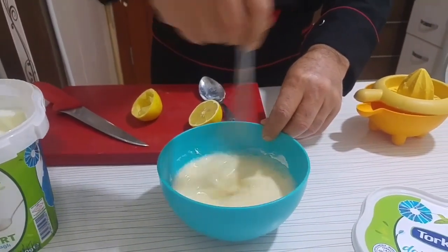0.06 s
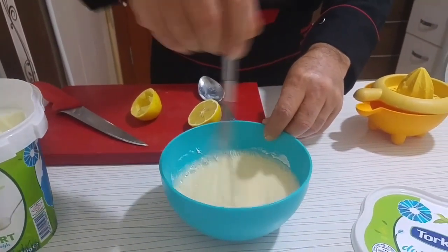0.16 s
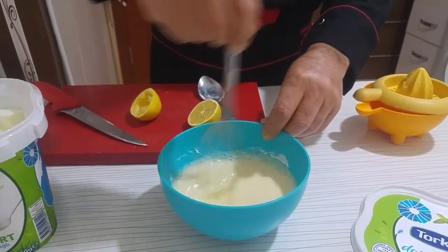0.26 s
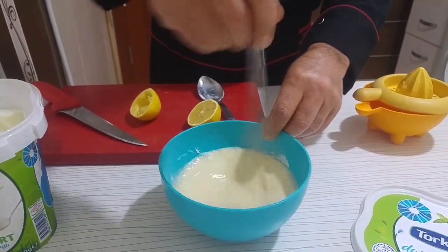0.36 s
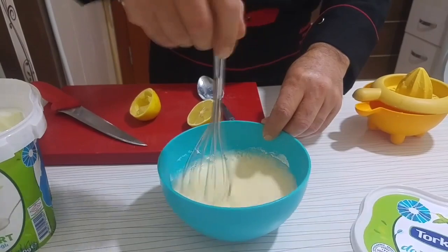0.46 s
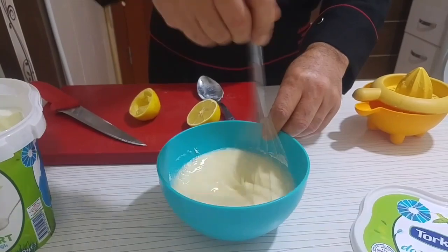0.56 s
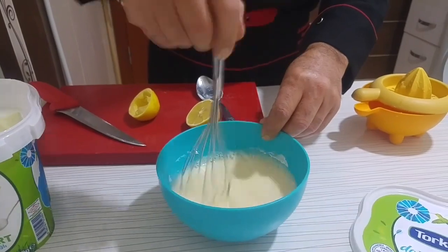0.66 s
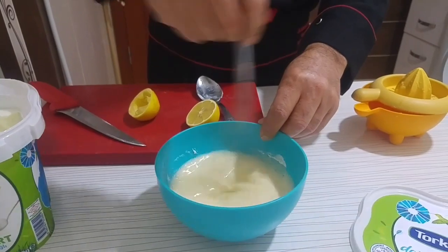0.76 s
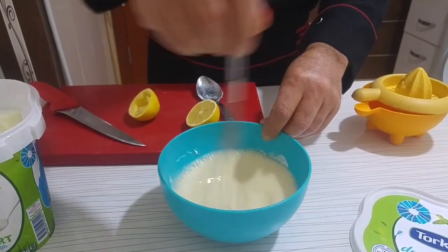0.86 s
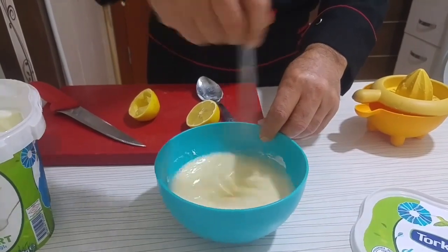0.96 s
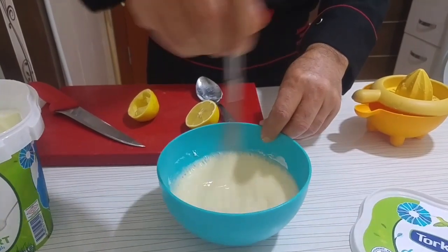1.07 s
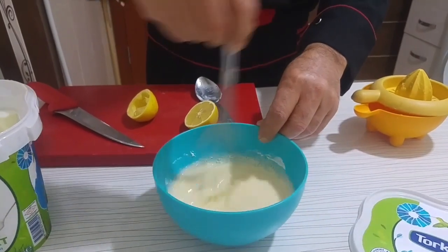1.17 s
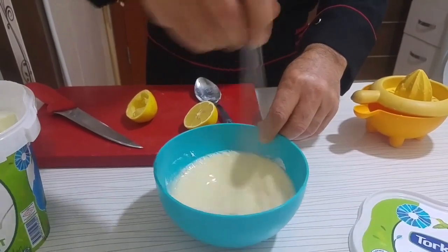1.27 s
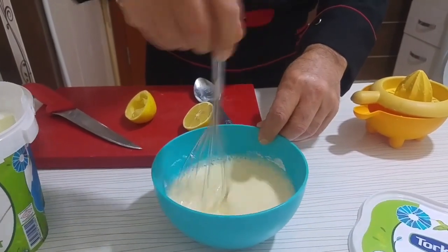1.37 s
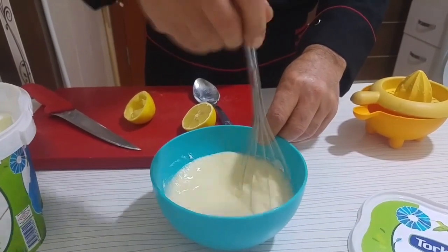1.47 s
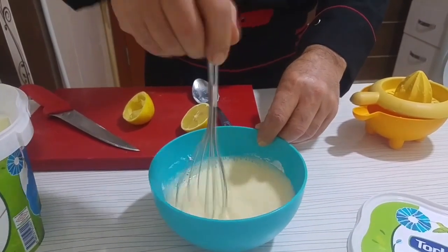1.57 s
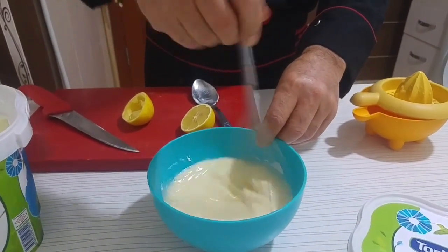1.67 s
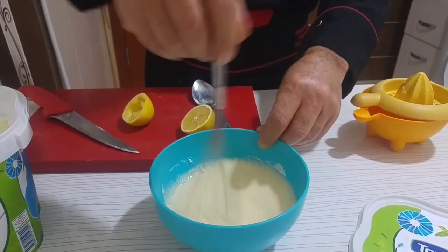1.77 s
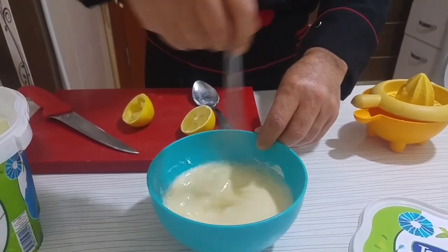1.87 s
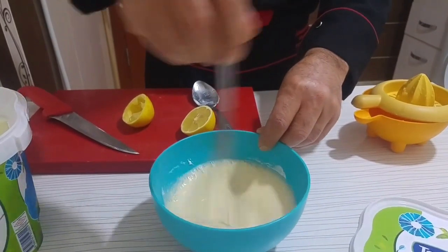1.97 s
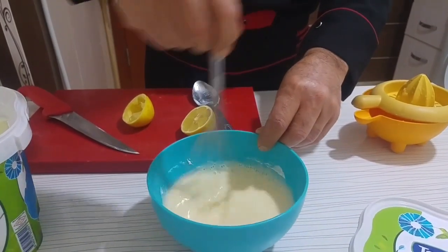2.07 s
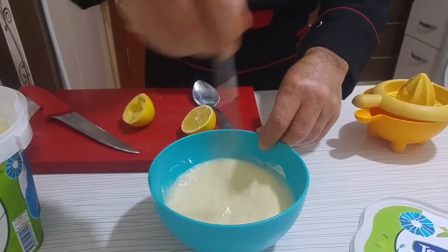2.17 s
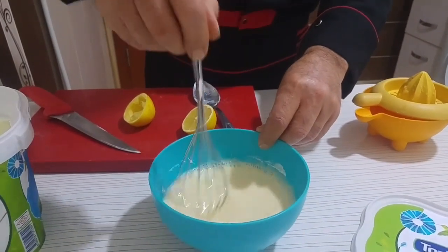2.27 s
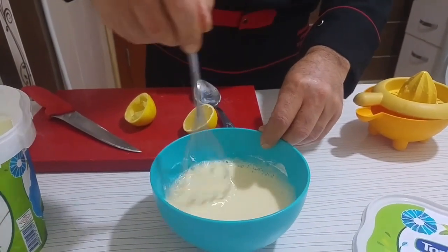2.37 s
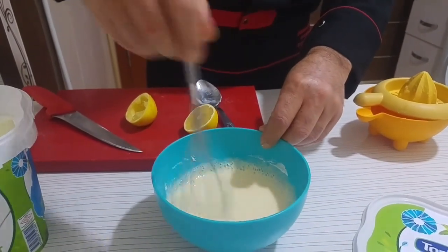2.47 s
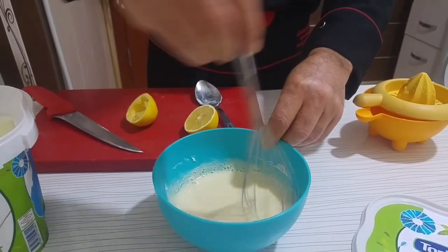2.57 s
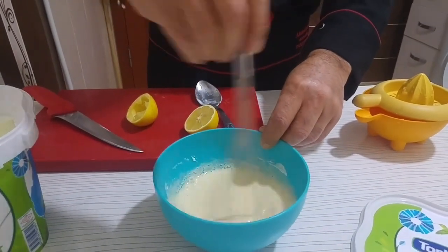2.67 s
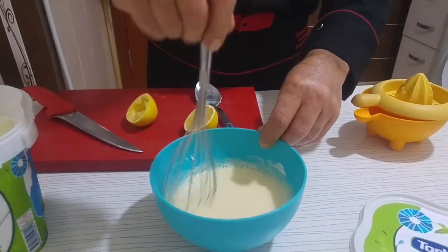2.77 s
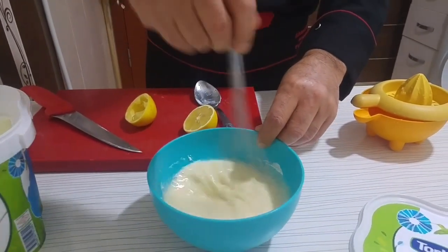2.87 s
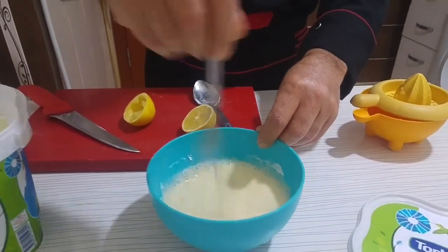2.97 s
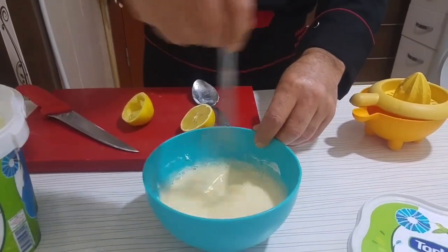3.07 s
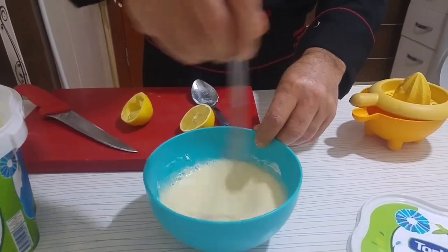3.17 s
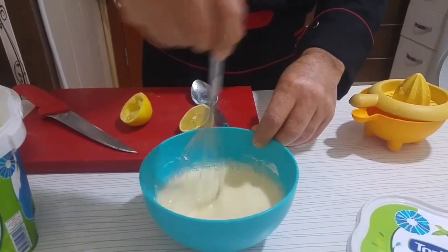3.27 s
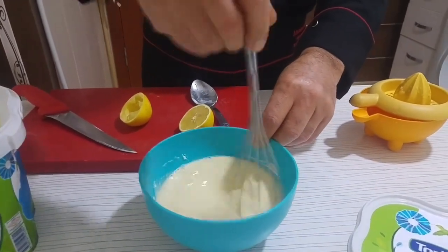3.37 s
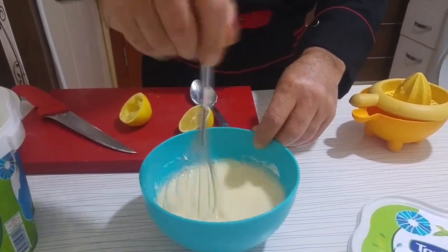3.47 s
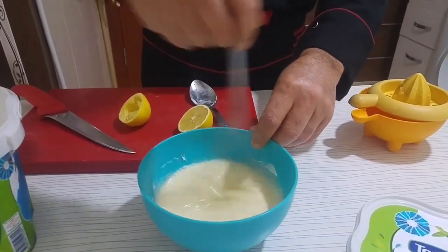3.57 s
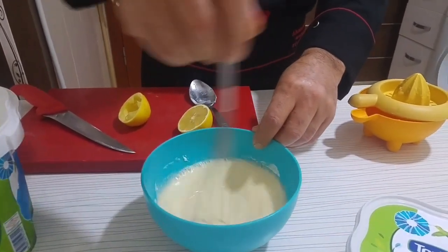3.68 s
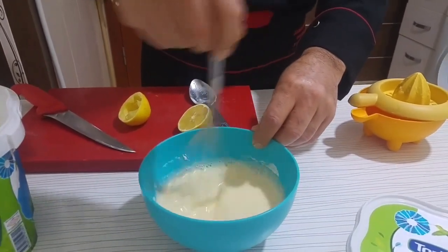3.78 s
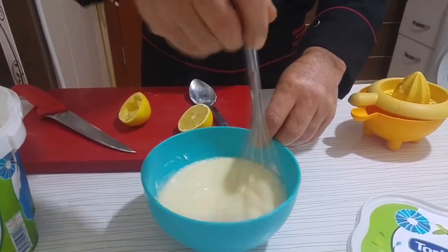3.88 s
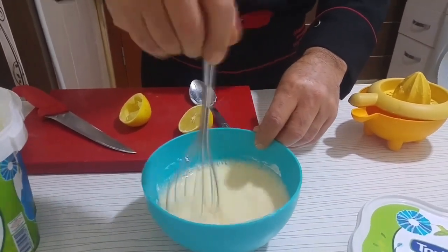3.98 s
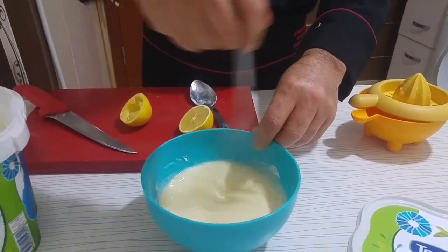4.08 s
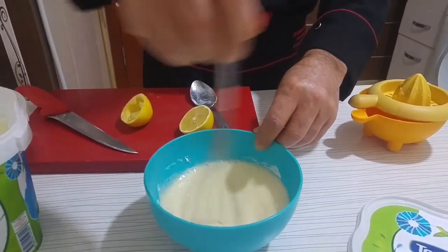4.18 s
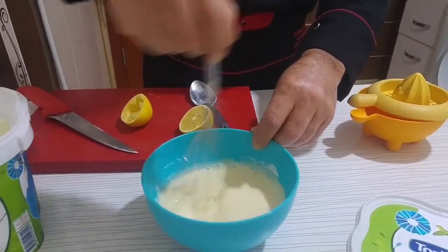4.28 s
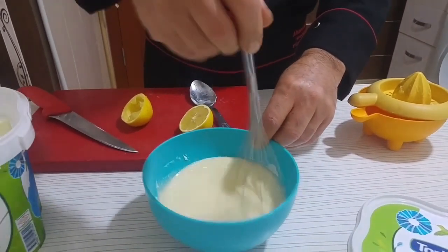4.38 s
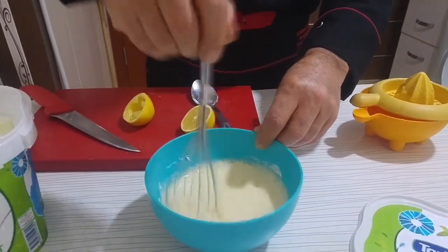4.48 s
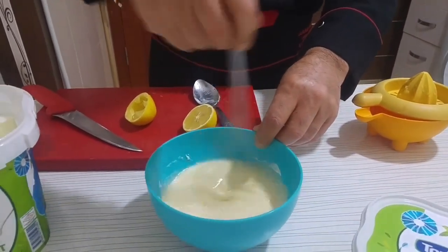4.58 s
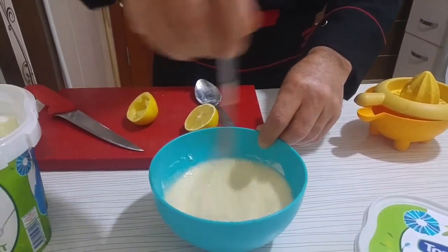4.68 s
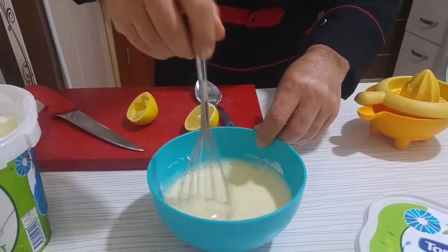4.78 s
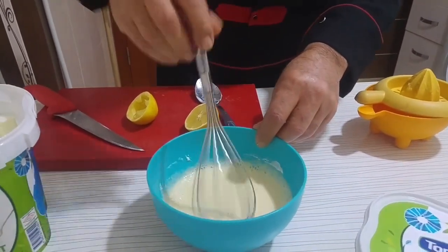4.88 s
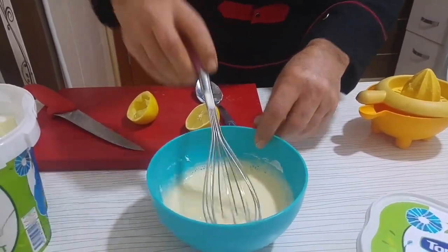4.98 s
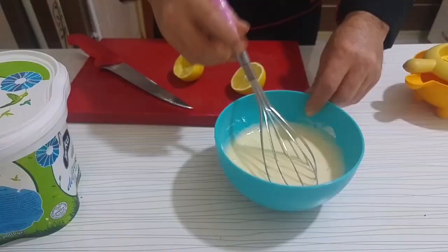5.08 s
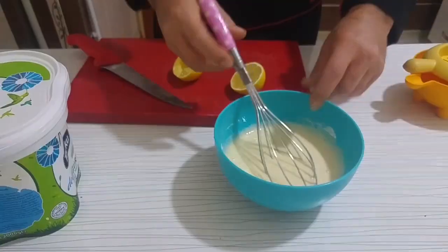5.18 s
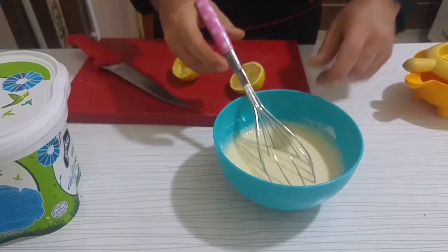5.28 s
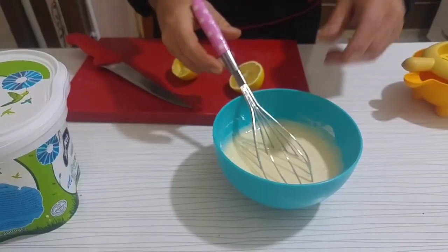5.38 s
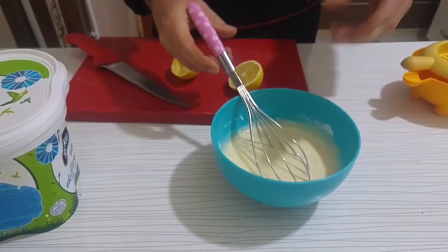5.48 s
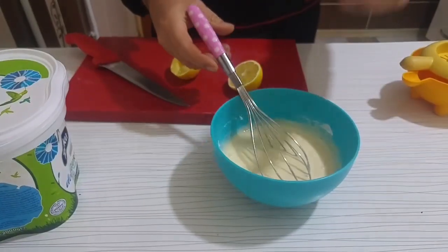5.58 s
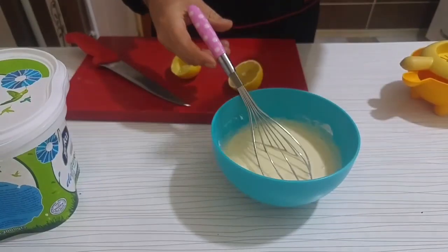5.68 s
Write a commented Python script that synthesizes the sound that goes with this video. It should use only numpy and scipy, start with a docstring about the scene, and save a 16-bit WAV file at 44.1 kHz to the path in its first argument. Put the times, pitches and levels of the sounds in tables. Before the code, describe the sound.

Close up, a steel wire whisk beats thick cream in a plastic bowl, about four clattering strokes a second. Between strokes single wires tick and ring the rim, cream squelches softly and the bowl thumps the table. A lull falls around two and a half seconds, then the beating resumes until just past five. Small, hard, lively kitchen in stereo.

```python
"""Whisking thick cream in a plastic bowl

A wire whisk beats thick cream on a kitchen table, about four turns a second, with a lull midway and near the end.
Each turn starts with the wires clattering on the wall: contacts excite damped wall modes and bright steel ticks.
Single wires tap on the way round and ring the rim; between them, random slips and pops make scrape and squelch.
Now and then the bowl rocks and thumps the table modes; a small hard kitchen echoes over faint hush and whine."""
import sys
import numpy as np
from scipy import signal
from scipy.fft import rfft, irfft
from scipy.io import wavfile

SR = 44100
rng = np.random.default_rng(int(sys.argv[2]) if len(sys.argv) > 2 else 0)


def store_wav(level_fs):
    """Save 16-bit WAV to argv[1]."""
    pcm = np.round(np.clip(np.atleast_2d(level_fs), -1, 1) * 32767)
    wavfile.write(sys.argv[1], SR, pcm.T.astype(np.int16))


N = 252252  # length [samples]
END_S = 5.274  # the sound stops here [s]
# Levels in all tables are relative: each layer sets its own trim on top.

# The wire cage hits the wall: (time [s], level [dB], wall pitch [Hz], wire tick level [dB],
# length of the clatter [s], firmness of the first contact [dB])
CAGE_STROKES = [(0.159, 8, 1390, 7, 0.018, 3), (0.386, 7.5, 1346, 7, 0.026, 8.5),
                (0.617, 12.5, 2016, 9.5, 0.021, 7), (0.855, 9.5, 1390, 8.5, 0.019, 7.5),
                (1.082, 9, 1390, 11.5, 0.019, 15), (1.304, 9, 1390, 7.5, .018, 9),
                (1.545, 10.5, 1460, 11, .012, 5), (1.773, 7.5, 2056, 5.5, 0.031, 8),
                (1.992, 10, 1380, 13, 0.02, 12), (2.228, 11, 1990, 11, 0.013, 6.5),
                (2.481, 16.5, 1850, 10, .014, 0.5), (2.956, 8, 1900, 4.5, 0.0083, 13),
                (3.202, 16, 1404, 15.5, .013, 5.5), (3.488, 4, 1275, 3, 0.018, -3),
                (3.673, 7, 1370, 7, 0.021, 8.5), (3.917, 10.5, 1390, 9.5, 0.03, 8.5),
                (4.164, 9, 1376, 7, .015, 5.5), (4.424, 8, 1380, 6.5, 0.02, -0.5),
                (4.669, 8.5, 2210, 10.5, .012, 7), (4.921, 9, 1400, 10.5, 0.012, 5)]


def strokes(body_db=-2.5, tick_db=-3.5, jangle_db=-10):
    """The wires of the cage hit the wall one after another, then jangle against each other."""
    body, steel = np.zeros((2, 2, N))
    for s, db, hz, wire_db, length_s, first_db in CAGE_STROKES:
        push = contacts(length_s, fade_db=-2.5, count=9, first_db=first_db, scatter_db=12)
        knock = clack(push, hz, spot_t60=0.037, spot_db=-3.1, spot_spread=.09)
        add(body, s, undb(db + body_db) * knock)
        clatter = ticks(push, tick_s=0.00039, zing_t60=0.016, zing_db=-3, snap_db=-3.5)
        add(steel, s, undb(wire_db + tick_db) * clatter)
        push = contacts(length_s=0.044, fade_db=-8, count=4, first_db=7.5, scatter_db=5.5)
        jangle = ticks(push, tick_s=0.00042, zing_t60=0.016, zing_db=-5.5)
        add(steel, s + length_s, undb(wire_db + tick_db + jangle_db) * jangle)
    return body + undb(5) * wires(steel)


# Single wires flick the bowl, on the rebound and on the way round: (time [s], level [dB],
# wall pitch [Hz], wire tick level [dB], rim pitch [Hz], rim level [dB])
WIRE_TAPS = [(0.004, -6, 1240, -8.5, 885, -3.5), (0.055, -6.5, 1460, -28, 897, -4),
             (0.095, 2.5, 1920, -4.5, 867, -3), (0.21, -8, 1970, -4, 954, -6.5),
             (0.261, -6, 1490, -27, 897, -10), (0.322, -18, 1810, -31, 955, -14),
             (0.437, -15, 1880, -3, 886, -4.5), (0.482, 1.5, 1480, -10.5, 847, -4),
             (0.534, -2.5, 1860, -7, 900, -15.5), (0.659, -7, 1710, -7, 980, -7),
             (0.72, -3.5, 1490, -7, 875, 0.5), (0.77, -3, 1730, -8.5, 863, -5),
             (0.899, -2, 1750, -2, 892, -6), (0.943, -2, 1480, -2.5, 884, 0.5),
             (0.992, -2, 1990, -15, 870, -13), (1.012, -1, 1880, -6.5, 960, -2.5),
             (1.06, -9, 1800, -6.5, 1060, -22), (1.133, -3, 1700, -4.0, 1000, -2.5),
             (1.176, -6.5, 2060, -8.5, 872, -5.5), (1.232, -4, 1870, -15.5, 1040, -17),
             (1.279, -6, 1810, -5, 1020, -21), (1.359, -4, 1870, -1, 965, -4),
             (1.411, 4.5, 1475, -4.5, 887, 2.5), (1.456, -0.5, 1920, -8.5, 1040, -7),
             (1.591, 4, 1324, -2, 976, -6), (1.641, 0, 1500, -6, 881, -2), (1.669, -5.5, 2160, -4, 900, 1),
             (1.694, 1.5, 1780, -3.5, 1050, -10.5), (1.824, -7.5, 1310, -5.5, 883, -4),
             (1.857, 3, 1445, -12.5, 870, 3.5), (1.9175, 9, 2030, 5, 1150, 4),
             (1.922, 11.5, 1780, -1, 1030, 5), (2.045, -2, 1310, -9.5, 903, -4.5),
             (2.092, -1.5, 1460, -6.5, 890, 3), (2.12, -0.5, 2210, -9.5, 896, -10),
             (2.148, -2, 1900, -9, 860, -1), (2.261, -2, 1350, -4.5, 970, -4),
             (2.322, -11.5, 1490, -20, 897, -3.5), (2.371, 1, 1845, -7.5, 1015, -17.5),
             (2.609, -5.5, 2000, -18, 1000, -6.5), (2.706, -17, 1160, -16.5, 1020, -14),
             (2.726, -8.5, 1244, -20, 960, -21), (2.864, -9.5, 1210, -19.5, 1070, -24.5),
             (2.892, -8.5, 2020, -10.5, 872, -8), (2.976, 0, 1840, -0.5, 1040, -4),
             (3.094, -2.5, 1730, -3, 973, -4), (3.135, 2, 1830, -8.5, 1020, -4),
             (3.195, 4, 1980, -3, 925, -4), (3.364, 0, 1870, -7.5, 990, -5.5),
             (3.441, -4, 1204, -8.5, 1030, -12), (3.518, 2.5, 1500, -4, 876, 2),
             (3.592, 0, 1990, -5, 872, -9), (3.696, 0.5, 2200, -0.5, 1030, -13),
             (3.737, -15.5, 1790, -15, 990, -6), (3.772, 5, 1420, -13, 860, 4.5),
             (3.855, 9, 1902, -1, 950, -8), (3.978, 0.5, 1254, -16, 970, -3.5),
             (4.223, -3.5, 2000, 0.5, 990, -1.5), (4.283, 1, 1480, -22, 892, -4),
             (4.32, -8, 1520, -21.5, 852, -11.5), (4.365, -3, 1720, -21, 1040, -8.5),
             (4.473, 0.5, 1980, -2.5, 967, -2.5), (4.537, 7, 1470, -3.5, 876, -1.5),
             (4.576, 3.5, 1855, -1.5, 870, -3), (4.729, -0.5, 2020, 1, 990, -4),
             (4.802, 1.5, 1530, -25, 867, 2.5), (4.838, 0.5, 1800, -3.5, 874, -1),
             (5.019, 4, 1435, -9.5, 866.5, 1)]
TAP_SKID_S = .005  # a tapping wire skids on for this long


def taps(body_db=-1, tick_db=-1, rim_db=1.2):
    """Single wires flick the wall, skid on in tiny bounces, and set the rim ringing."""
    body, steel = np.zeros((2, 2, N))
    for s, db, hz, wire_db, rim_hz, ring_db in list(WIRE_TAPS) + strays():
        push = contacts(TAP_SKID_S, fade_db=-6.5, count=4, first_db=3.5, scatter_db=-2)
        knock = clack(push, hz, spot_t60=0.042, spot_db=6.5, spot_spread=.012)
        add(body, s, undb(db + body_db) * knock)
        flick = ticks(push, tick_s=0.00024, zing_t60=0.026, zing_db=13.0, snap_db=-11.5)
        add(steel, s, undb(wire_db + tick_db) * flick)
        add(body, s, undb(ring_db + rim_db) * rim(rim_hz))
    return body + undb(3.5) * wires(steel)


# Wall pitches that stray wires strike: (lowest [Hz], highest [Hz])
STRAY_RANGE = (1310, 2330)


def strays(stray_db=-10, stray_spread_db=4, stray_tick_db=-11, stray_rim_db=-14, stray_rim_hz=900, count=26):
    """Faint chance contacts of stray wires, in the columns of the taps."""
    rows = []
    for k, (when, force, spot) in enumerate(rng.random((count, 3))):
        s = END_S * (k + when) / count
        db = effort_db(s) + stray_spread_db * (2 * force - 1)
        hz = np.interp(spot, [0, 1], STRAY_RANGE)
        rows.append((s, stray_db + db, hz, stray_tick_db + db, stray_rim_hz, stray_rim_db + db))
    return rows


RIM_T60_S, RIM_FREE_HZ = 0.18, 859  # decay and pitch of the free rim
RIM_DAMP_HZ = 118  # rise in pitch that shortens the decay e-fold
RIM_SPLIT, RIM_SPLIT_DB = 1.03, -8  # pitch ratio and level of the rim's twin mode


def rim(hz):
    """The rim's note, a close pair under the uneven fill; a wire pressing on it raises and shortens it."""
    t60 = RIM_T60_S * np.exp(-max(hz - RIM_FREE_HZ, 0) / RIM_DAMP_HZ)
    blow = signal.unit_impulse(SR // 3)
    twin = ring(blow, hz * RIM_SPLIT, t60 / 2)
    return unit(ring(blow, hz, t60) + undb(RIM_SPLIT_DB) * twin)


# Colour of the wall's clack; so small and thin a wall radiates little bass: (frequency [Hz], level [dB])
CLACK_COLOUR = [(200, -22.5), (600, -3), (800, -3), (1100, -0.5), (1700, 1), (2150, -1), (2500, -4.5),
                (5000, -1), (12000, -4)]


def clack(push, hz, spot_t60, spot_db, spot_spread):
    """Each wire strikes its own spot, which gives a short pitched clack and shakes the whole wall."""
    at = np.flatnonzero(push)
    blow, spots = signal.unit_impulse(len(push)), np.zeros((2, 2 * len(push)))
    for i, (pitch, side) in zip(at, rng.standard_normal((len(at), 2))):
        note = push[i] * ring(blow, hz * np.exp(spot_spread * pitch), spot_t60)
        balance = 1 + 0.11 * side * np.array([[1], [-1]])
        spots[:, i:i + len(push)] += balance * note
    load = 1 + .012 * rng.standard_normal()
    both = unit(wall(push, load)) + undb(spot_db) * unit(spots[:, :len(push)])
    return unit(colour(both, CLACK_COLOUR))


# Modes of the bowl wall, damped by the cream: (frequency before cream load [Hz], level [dB], t60 [s])
WALL_MODES = [(920, -8, 0.006), (1060, -3.5, 0.031), (1191.4, -7.5, 0.19), (1303, -4, 0.067),
              (1453, -2.5, 0.048), (1747, -2, 0.056), (1870, -3.5, 0.017), (2082, -1, 0.018),
              (2650, -6.5, 0.031)]


def wall(push, load=1):
    """The bowl wall, with a new mix of its modes at every contact; clinging cream scales their pitch."""
    return sum(undb(db) * ring(scatter(push, spread=0.09), hz * load, t60) for hz, db, t60 in WALL_MODES)


def ticks(push, tick_s, zing_t60, zing_db, snap_db=-6, count=16):
    """Steel on plastic: a bright crack, and each wire zings briefly with its own mix of partials."""
    grit = signal.lfilter([1], [1, -np.exp(-2 / (tick_s * SR))], push ** 2)
    crack = np.sqrt(grit) * rng.standard_normal((2, len(push)))
    partials = np.geomspace(2500, 13000, count) * (1 + 0.045 * rng.standard_normal(count))
    # zing_t60 holds at 4 kHz; higher partials die sooner
    zing = sum(ring(scatter(push, spread=1.0), hz, zing_t60 * 4000 / hz) for hz in partials)
    # only the hardest contacts are brief enough to reach the top octave
    snap = signal.lfilter([1, -2, 1], [1], scatter(push ** 2, spread=.6))
    return unit(unit(crack) + undb(zing_db) * unit(zing)) + undb(snap_db) * unit(snap)


# Colour of a wire's tick: (frequency [Hz], level [dB])
TICK_COLOUR = [(600, -45.5), (1500, -3), (2400, -1), (3200, -0.5), (3750, 2), (4250, 1), (4900, 2),
               (5900, -0.5), (6600, -2.5), (7800, -8), (8600, -9), (11000, -13), (14500, -19), (16000, -35)]
# Partials of the steel wires: (frequency [Hz], width [Hz], level [dB])
WIRE_PARTIALS = [(2593, 36, -6), (3738, 60, -9), (4847, 51, -4.5), (5260, 120, -7), (6620, 75, -1.5)]


def wires(steel):
    """The ticks take on the colour of steel and leave the wires' partials ringing."""
    bright = colour(steel, TICK_COLOUR)
    ringing = 0
    for hz, width_hz, db in WIRE_PARTIALS:
        ringing = ringing + undb(db) * signal.lfilter(*signal.iirpeak(hz, hz / width_hz, fs=SR), bright)
    return bright + ringing


# The wires are deepest in the cream this long after a stroke [s]; how much quieter when they lift [dB]
PLOUGH_S, SQUELCH_SWING_DB = 0.11, 6
# The whisk presses hardest on the bottom this long after a stroke [s]; how much quieter when it lifts [dB]
PRESS_S, RUMBLE_SWING_DB = 0.074, 6.5


def drag(squelch_db=-35.0, scrape_db=-38.5, rumble_db=-38.0, skid_db=-4, slip_db=3, slip_hz=45, count=16):
    """Wires stick and slip on the wall and air pops in the cream; squelch and rumble swell once a turn."""
    t = np.arange(N) / SR
    wet = undb(squelch_db + effort_db(t) + swing_db(PLOUGH_S, SQUELCH_SWING_DB))
    press = undb(rumble_db + effort_db(t) + swing_db(PRESS_S, RUMBLE_SWING_DB))
    dry = undb(scrape_db + effort_db(t)) + undb(skid_db) * skid(column=0)
    # the grip comes and goes as one wire after another ploughs through
    slip = undb(slip_db * wander(slip_hz))

    pitches = np.geomspace(780, 2200, count)
    pops = sum(ring(scatter(grains(rate=12, spread_db=5.0), spread=0.5), hz, 30 / hz) for hz in pitches)
    slipping = wall(slip * grains(rate=300, spread_db=5))
    squelch = unit(unit(slipping) + unit(pops))

    rub = slip * grains(rate=240, spread_db=2.0)
    rasp = ticks(rub, tick_s=0.00026, zing_t60=0.0054, zing_db=21.0, count=40)
    scrape = unit(colour(rasp, TICK_COLOUR))

    jolts = np.diff(slip * grains(rate=110, spread_db=1.0), prepend=0)
    rumble = unit(table(jolts, np.zeros(len(TABLE_MODES))))
    # sqrt(N) turns unit energy into unit rms
    return np.sqrt(N) * (wet * squelch + press * rumble + dry * scrape)


# Colour of wires swishing through cream: (frequency [Hz], level [dB])
SWISH_COLOUR = [(400, -27.5), (800, -4), (1250, -2), (1900, 2), (2400, -2.5), (2900, -0.5), (5000, -12.5),
                (8000, -26.5), (15000, -35)]


def swishes(slosh_db=-42, slosh_swing_db=10, surge_db=4, surge_hz=22):
    """Cream slides through the wires in uneven surges once a turn, and along the long skids."""
    t = np.arange(N) / SR
    surge = surge_db * wander(surge_hz)
    flow = undb(slosh_db + effort_db(t) + swing_db(PLOUGH_S, slosh_swing_db) + surge)
    film = unit(colour(scatter(grains(rate=900, spread_db=2.5), spread=0.24), SWISH_COLOUR))
    return np.sqrt(N) * (flow + skid(column=1)) * film


# A wire skids a long way along the wall: (middle [s], length [s], dry scrape level [dB], wet swish level [dB])
LONG_SKIDS = [(0.092, .025, -50, -29), (1.482, 0.031, -41, -31), (2.778, 0.041, -43.5, -36),
              (2.807, 0.028, -43.5, -44), (3.405, 0.043, -33.5, -35.5), (3.76, 0.025, -33.5, -44.5),
              (4.083, 0.013, -61, -33.5), (4.358, 0.015, -50, -33.5)]


def skid(column):
    """Gain of the long skids, each swelling and fading; column 0 is the bare wall, 1 the cream."""
    t = np.arange(N) / SR
    return sum(undb(db[column]) * np.exp(-(2 * (t - s) / length_s) ** 2) for s, length_s, *db in LONG_SKIDS)


def plops(level_db=-15, spread_db=4, low_hz=1050, high_hz=2500, cycles=14, glide=0.032, count=90):
    """Air pockets burst behind the wires: each is a short note of its own pitch that glides up."""
    out, t = np.zeros((2, N)), np.arange(SR // 25) / SR
    depth_db = swing_db(PLOUGH_S, SQUELCH_SWING_DB)
    for k, (when, force, pocket, place) in enumerate(rng.random((count, 4))):
        s = END_S * (k + when) / count
        hz = low_hz * (high_hz / low_hz) ** pocket
        fade = np.exp(-t * hz / cycles)
        phase = 2 * np.pi * np.cumsum(hz * (1 + glide * (1 - fade))) / SR
        note = unit(fade * np.sin(phase))
        turn_db = depth_db[min(int(s * SR), N - 1)]
        db = level_db + effort_db(s) + turn_db + spread_db * (2 * force - 1)
        balance = np.sqrt([[.5 + place], [1.5 - place]])
        add(out, s, undb(db) * balance * note)
    return out


# Vigour of the whisking, with a lull midway and near the end: (time [s], effort [dB])
WHISK_EFFORT = [(0, -1), (.6, -4), (1.1, -0.5), (1.7, 1), (2.36, 0.5), (2.46, -10), (2.66, -12.5),
                (2.92, -7.5), (3.13, -3.5), (3.3, -3.5), (3.62, -2), (4.1, 3), (4.85, 0.5), (5.0, -2.5),
                (5.09, -19), (5.25, -14)]


def effort_db(s):
    """Vigour of the whisking at a time."""
    return np.interp(s, *np.transpose(WHISK_EFFORT))


TURN_S = 0.25  # time for one free turn


def swing_db(peak_s, depth_db):
    """A level that swells and sinks once a turn; every stroke starts a new turn."""
    t = np.arange(N) / SR
    starts = np.r_[CAGE_STROKES[0][0] - TURN_S, [row[0] for row in CAGE_STROKES]]
    latest = np.maximum(np.searchsorted(starts, t, side="right") - 1, 0)
    age = t - starts[latest]
    return depth_db * (np.cos(2 * np.pi * (age - peak_s) / TURN_S) - 1) / 2


# The bowl rocks on the table: (time [s], level [dB], hollow knock level [dB])
BOWL_THUMPS = [(0.005, -6.5, -26), (0.242, -11, -16), (0.478, -5.5, -23), (0.719, 3.5, 2),
               (0.742, -1.5, -6), (0.897, -4, -4), (0.944, -3.5, -20), (1.171, 0.5, -7.5), (1.226, -15, -6),
               (1.408, 0.5, -3), (1.591, -4.5, -5), (1.641, -7, -11.5), (1.871, -4, -3), (1.918, -1.5, 4),
               (2.091, 6.5, 8), (2.112, 5, -8.5), (2.26, -2, 1.5), (2.321, 6.5, 3), (2.866, -11, -24.5),
               (2.959, -3, 2.5), (3.029, 4.5, 0.5), (3.204, 6, -12.5), (3.364, -6, -15), (3.522, -1.5, -4),
               (3.772, -4, -20), (3.857, -5, -5.5), (3.979, -7.5, -14), (4.039, 4.5, 2), (4.221, 0.5, 1.5),
               (4.281, -2, -6), (4.535, 5, 2), (4.577, -5, -7.5), (4.779, 5, 5), (5.02, -3, -16),
               (5.26, -3.5, -11)]
# Modes of the foot of the bowl: (frequency [Hz], level [dB], t60 [s])
FOOT_MODES = [(350, -4, 0.041), (423, -11, 0.025), (546, -2.5, 0.025), (632, -4, 0.042), (693, -2, 0.22),
              (731, -9, 0.0073), (868, -4.5, 0.035)]
NUDGE_DB, NUDGE_KNOCK_DB = -17, -18  # shares of a stroke that reach the table and the foot of the bowl


def thumps(boom_db=-0.5, thud_db=-6, foot_db=-3.0, thud_hz=250, thud_t60=0.014, soft_hz=490, size=16000):
    """The bowl drops back on its foot: one blow sets off all the table's modes, with a hollow knock."""
    low, knocks = np.zeros((2, N))
    blow = signal.unit_impulse(size)
    nudges = [(s, db + NUDGE_DB, db + NUDGE_KNOCK_DB) for s, db, *_ in CAGE_STROKES]
    for s, db, knock_db in BOWL_THUMPS + nudges:
        push = contacts(length_s=0.00494, fade_db=-7.5, count=3)
        knock = sum(undb(d) * ring(scatter(push, spread=0)[0], hz, t60) for hz, d, t60 in FOOT_MODES)
        place = 2.5 * rng.standard_normal(len(TABLE_MODES))
        add(low, s, undb(db + boom_db) * unit(table(blow, place)))
        add(low, s, undb(db + thud_db) * ring(blow, thud_hz, thud_t60))
        add(knocks, s, undb(knock_db + foot_db) * unit(knock))
    # the soft plastic foot keeps the treble out of the table
    soft = signal.butter(5, [121, soft_hz], "band", fs=SR, output="sos")
    return knocks + signal.sosfilt(soft, low)


# Modes of the table top: (frequency [Hz], level [dB], t60 [s])
TABLE_MODES = [(138, 7.5, 0.37), (163.3, 6, 0.49), (195, 0.5, 0.15), (215.3, 0, 0.41), (254.9, 0.5, 0.78),
               (294.2, 3.5, 0.2), (336, -7, 0.11), (395.5, -8.5, 0.041)]


def table(push, place):
    """The table top booms; the place of the blow weights its modes (in dB)."""
    return sum(undb(db + shift_db) * ring(push, hz, t60) for (hz, db, t60), shift_db in zip(TABLE_MODES, place))


def kitchen(x, count=4):
    """The arm and whisk keep moving, so the echoes cycle through several patterns, three rounds a second."""
    turn = 3 * np.arange(N) / SR % 1 * count
    shares = [np.interp(turn, np.arange(count), corner, period=count) for corner in np.eye(count)]
    return sum(signal.fftconvolve(x * np.sqrt(share), echoes(), axes=-1)[:, :N] for share in shares)


# What the kitchen throws back: (frequency [Hz], level [dB], t60 [s])
KITCHEN_BANDS = [(99, -3.5, 0.17), (290, -2, 0.73), (690, 4.5, 0.59), (892, 0, 0.38), (1500, -5, 0.14),
                 (2590, 0.5, 0.44), (4870, -1, 0.3), (7560, 3.5, 0.22), (14300, 9, 0.29)]


def echoes(wet_db=-2, early_db=-6, early_s=0.0036, gap_s=0.00053, size=22000):
    """Near surfaces answer at once, then the walls ring on; the bass is alike on both sides."""
    hz, db, t60 = np.transpose(KITCHEN_BANDS)
    t, f = np.arange(size) / SR, np.maximum(np.fft.rfftfreq(size, 1 / SR), 1)
    mid, side = rfft(rng.standard_normal((2, size)))
    width = np.minimum(f / 700, 1) ** 1.4
    field = (mid + width * side * np.array([[1], [-1]])) / np.sqrt(1 + width ** 2)
    early = undb(early_db) * unit(np.exp(-t / early_s) * (t > .001))
    response = 0
    for k, share in enumerate(np.eye(len(hz))):
        late = undb(wet_db) * unit(undb(-60 * t / t60[k]) * (t > gap_s))
        band = irfft(field * np.interp(np.log(f), np.log(hz), share))
        response = response + undb(db[k]) * np.hypot(early, late) * band
    return response


# Colour of the steady background: (frequency [Hz], level [dB])
HUSH_COLOUR = [(25, -9.5), (50, 17), (90, -12), (150, 6), (300, -9.5), (900, 5), (2400, -24.5), (4000, -26),
               (6700, -6), (8000, -11.5), (15000, -21)]


def background(level_db=-53, whine_db=-53, whine_hz=5130, whine_t60=.035):
    """Faint steady noise of the room, with a thin high whine of noise through one resonance."""
    noise = rng.standard_normal(N) + 0.28 * rng.standard_normal((2, N))
    hush = unit(colour(noise, HUSH_COLOUR))
    whine = unit(ring(rng.standard_normal((2, N)), whine_hz, whine_t60))
    return np.sqrt(N) * (undb(level_db) * hush + undb(whine_db) * whine)


def contacts(length_s, fade_db, count, first_db=6, scatter_db=8, size=6000):
    """A first contact of set firmness, then further wires and bounces of chance force along a fading slope."""
    when, force = rng.random((count, 2)).T
    later = np.arange(count) > 0
    place = (np.arange(count) + when * later) / count
    push = np.zeros(size)
    at = np.clip(place * length_s * SR, 0, size - 1).astype(int)
    push[at] = undb(fade_db * place + np.where(later, scatter_db * force, first_db))
    return push


def grains(rate, spread_db):
    """Random tiny slips and pops (rate per second), mostly weak and a few strong."""
    return (rng.random(N) < rate / SR) * undb(spread_db * np.minimum(rng.exponential(size=N), 4))


def wander(hz):
    """A random line through a new normal value hz times a second."""
    return np.interp(np.arange(N) / SR * hz, np.arange(N // 500), rng.standard_normal(N // 500))


def scatter(push, spread):
    """Each contact lands on another spot, so it reaches the two sides with other weights."""
    at = np.flatnonzero(push)
    mid, side = rng.standard_normal((len(at), 2)).T
    out = np.zeros((2, len(push)))
    out[:, at] = push[at] * (np.sign(mid) + spread * side * np.array([[1], [-1]]))
    return out


def ring(push, hz, t60):
    """One damped mode, with the same energy whatever its decay."""
    r, w = np.exp(-np.log(1000) / (t60 * SR)), 2 * np.pi * hz / SR
    return signal.lfilter([0, np.sin(w) * np.sqrt(1 - r * r)], [1, -2 * r * np.cos(w), r * r], push)


def colour(x, points):
    """Causal minimum-phase filter with the given (Hz, dB) outline, built from its cepstrum."""
    hz, db = np.transpose(points)[:2]
    grid = np.maximum(np.fft.rfftfreq(2048, 1 / SR), 1)
    cep = irfft(np.log(undb(np.interp(np.log(grid), np.log(hz), db))))
    half = len(cep) // 2
    folded = np.r_[cep[0], 2 * cep[1:half], np.zeros(half)]
    response = irfft(np.exp(rfft(folded)))
    return signal.fftconvolve(x, response[None], axes=-1)[:, :x.shape[-1]]


def undb(db):
    """Decibels to gain."""
    return 10 ** (np.asarray(db) / 20)


def unit(x):
    """Scale to an energy of one per channel."""
    return x / np.sqrt(np.mean(np.sum(x ** 2, axis=-1)) + 1e-18)


def add(out, s, x):
    """Mix a sound in at a time."""
    i = max(int(s * SR), 0)
    out[..., i:i + x.shape[-1]] += x[..., :N - i]


def scene():
    """Whisk, cream, bowl and table in the kitchen."""
    near = strokes() + taps() + drag() + swishes() + plops() + thumps()
    return near + kitchen(near) + background()


# Left minus right at the microphone: (frequency [Hz], level difference [dB])
SIDE_LEAN = [(100, 0), (250, -1), (700, 0), (1290, 3), (2380, 1.5), (4400, 1.5), (8120, -3), (15000, 2)]
# Narrow dips in the colour at the microphone: (frequency [Hz], width [Hz], share removed [0-1])
COLOUR_DIPS = [(510, 190, 0.85), (7830, 176, 0.9)]
TOP_HZ = 15600  # upper limit of the sound


def record(dry):
    """Each side has its own colour; deep bass and top are cut, peaks are rounded, and the sound stops short."""
    left = colour(dry[:1], [(hz, db / 2) for hz, db in SIDE_LEAN])[0]
    right = colour(dry[1:], [(hz, -db / 2) for hz, db in SIDE_LEAN])[0]
    sides = np.array([left, right])
    for hz, width_hz, share in COLOUR_DIPS:
        sides = sides - min(share, 1) * signal.lfilter(*signal.iirpeak(hz, hz / width_hz, fs=SR), sides)
    sides = signal.sosfilt(signal.butter(4, 42, "high", fs=SR, output="sos"), sides)
    running = np.clip((END_S - np.arange(N) / SR) / .004, 0, 1)
    top = signal.ellip(8, .2, 70, TOP_HZ, fs=SR, output="sos")
    return signal.sosfilt(top, np.tanh(sides) * running)


dry = scene()
out = record(dry)
store_wav(out)
```